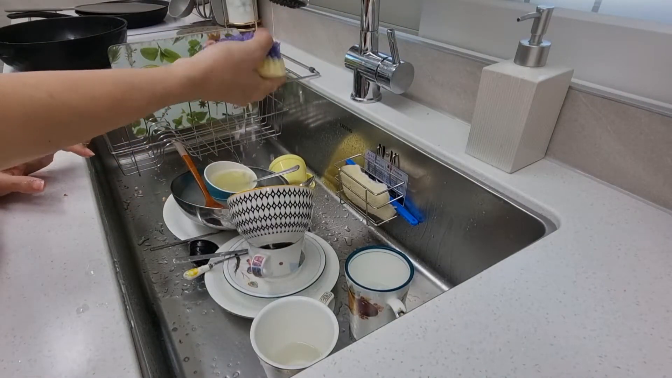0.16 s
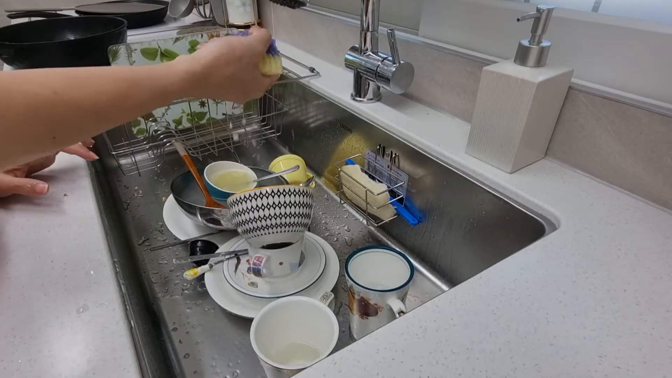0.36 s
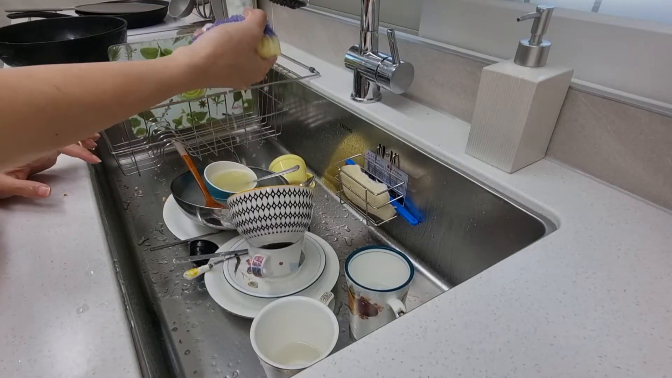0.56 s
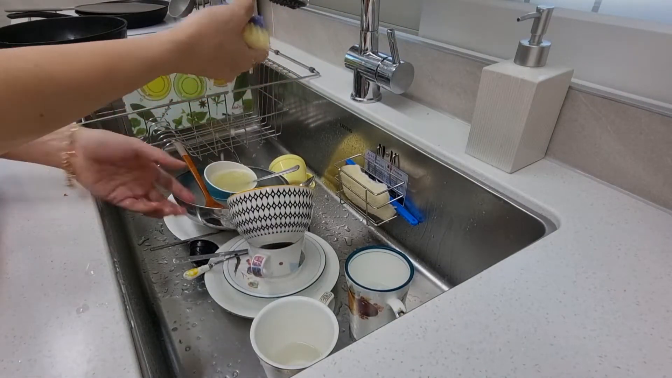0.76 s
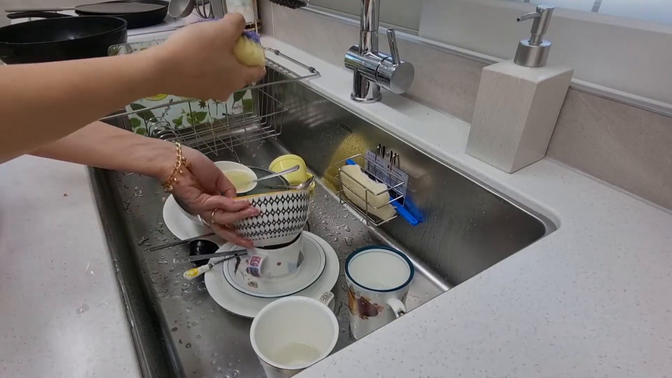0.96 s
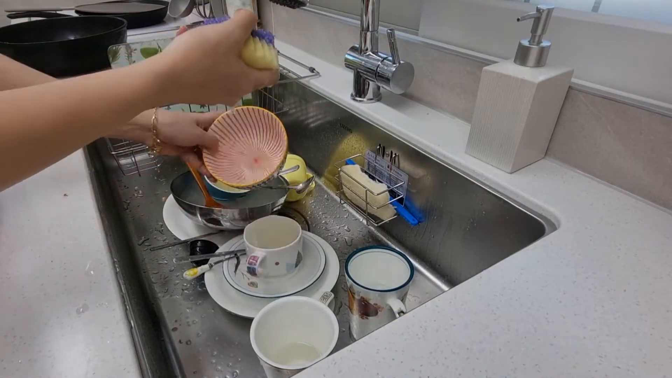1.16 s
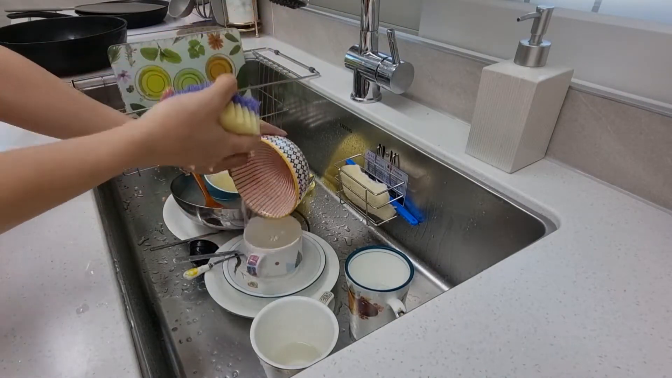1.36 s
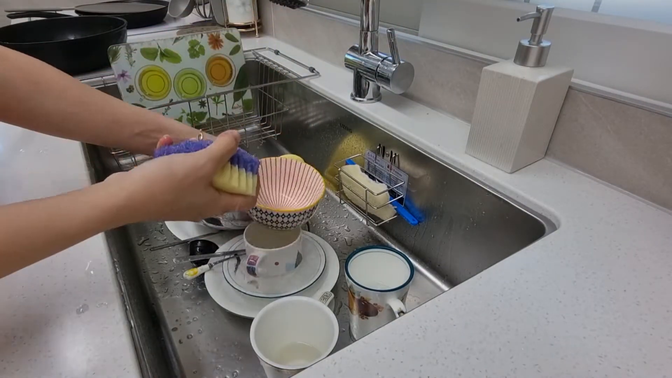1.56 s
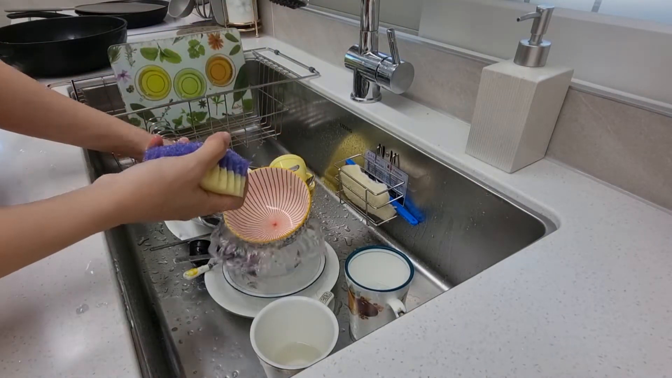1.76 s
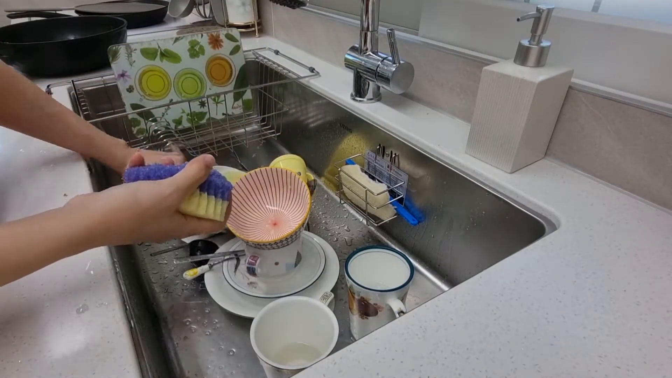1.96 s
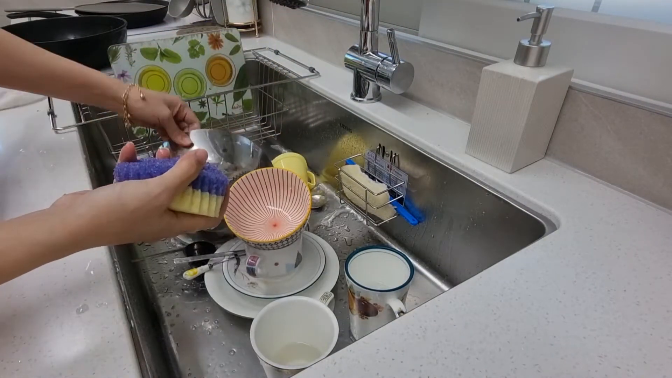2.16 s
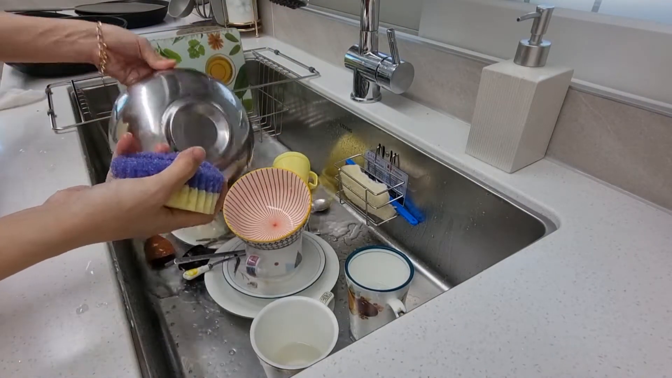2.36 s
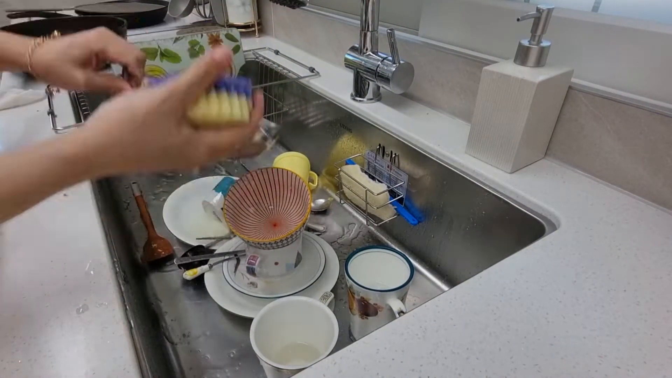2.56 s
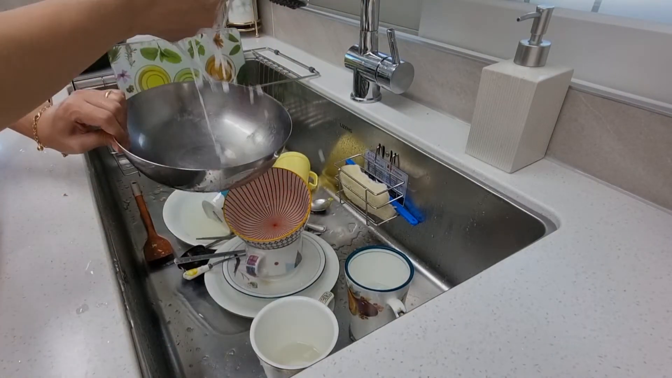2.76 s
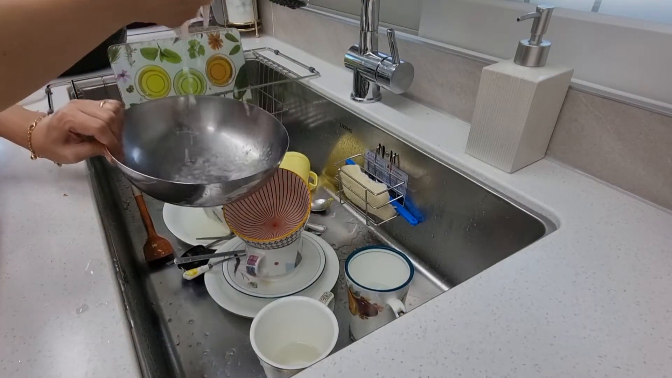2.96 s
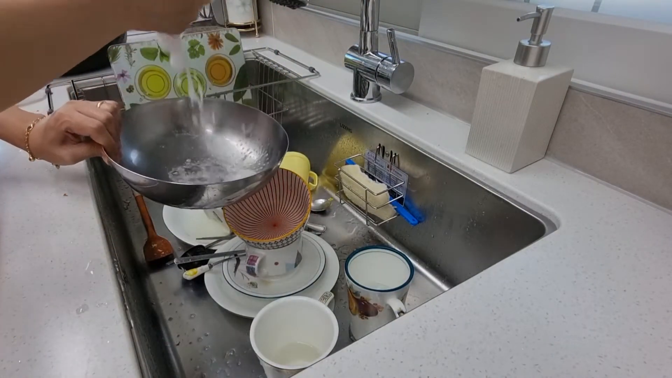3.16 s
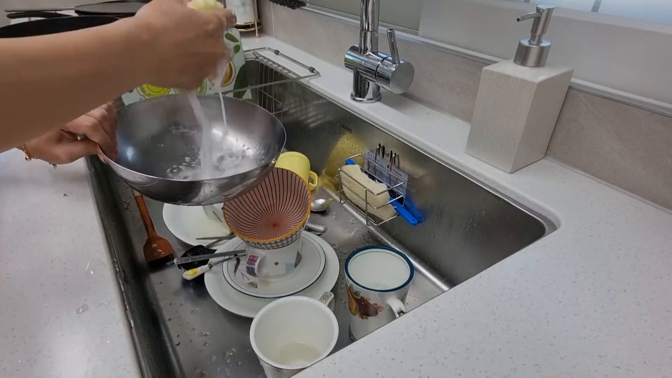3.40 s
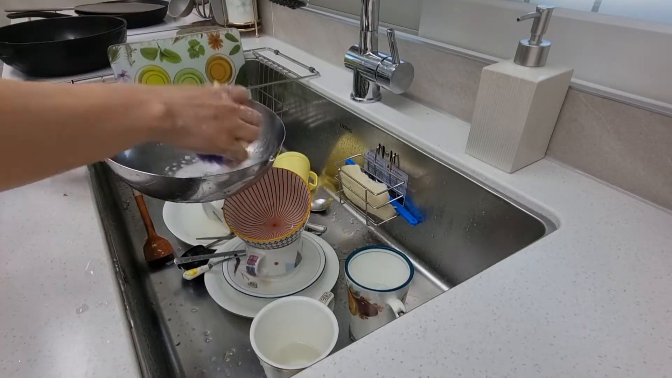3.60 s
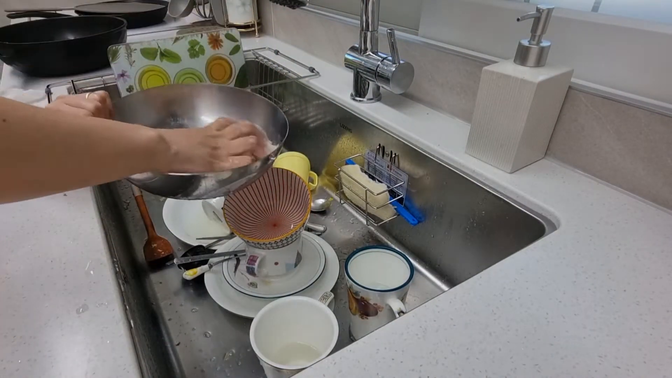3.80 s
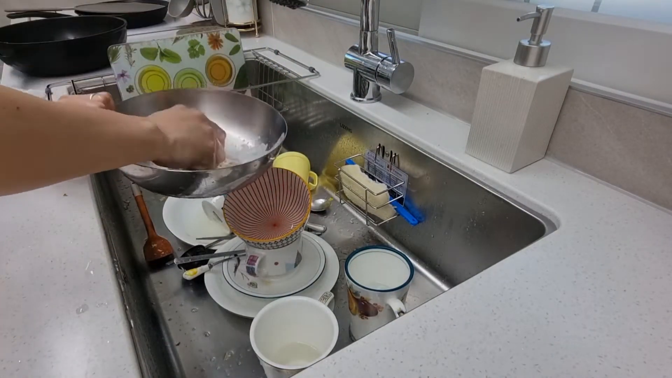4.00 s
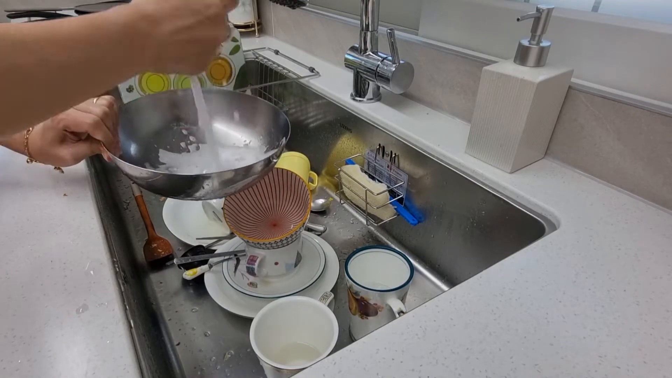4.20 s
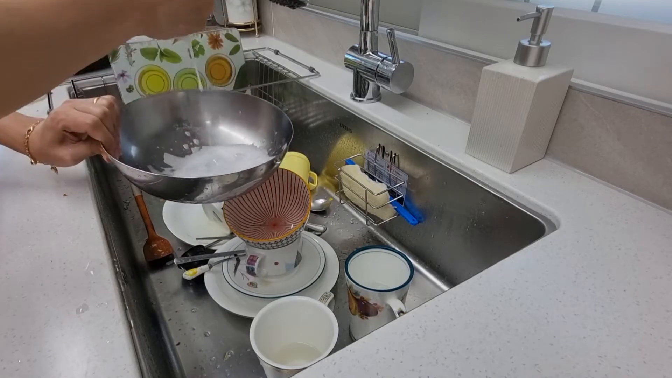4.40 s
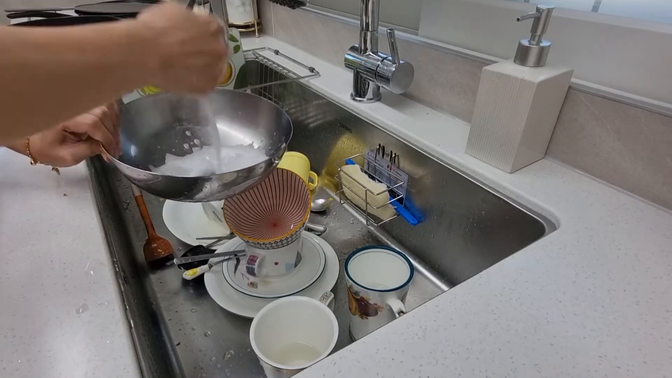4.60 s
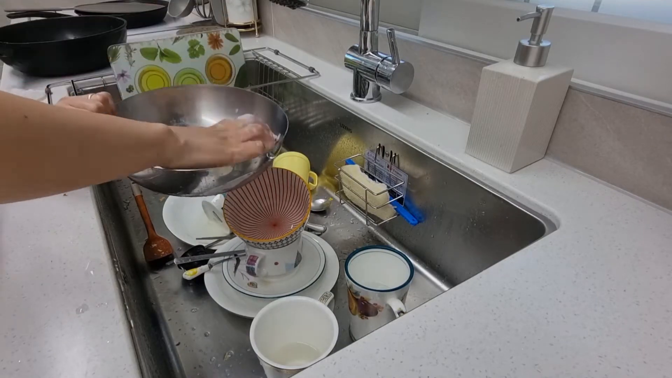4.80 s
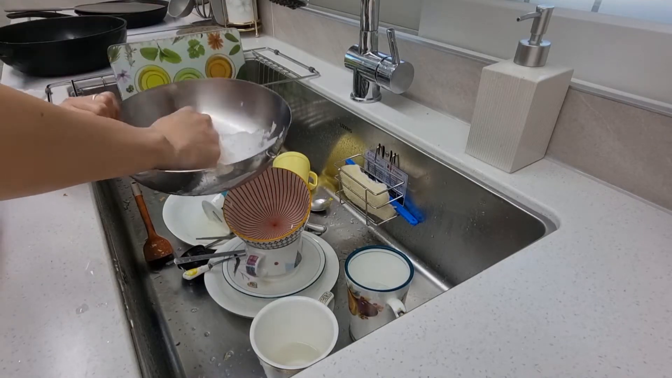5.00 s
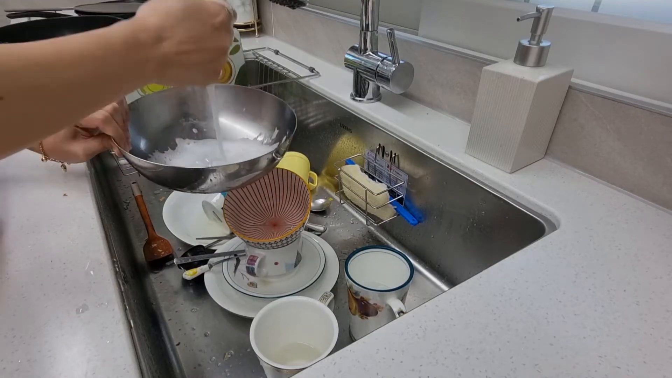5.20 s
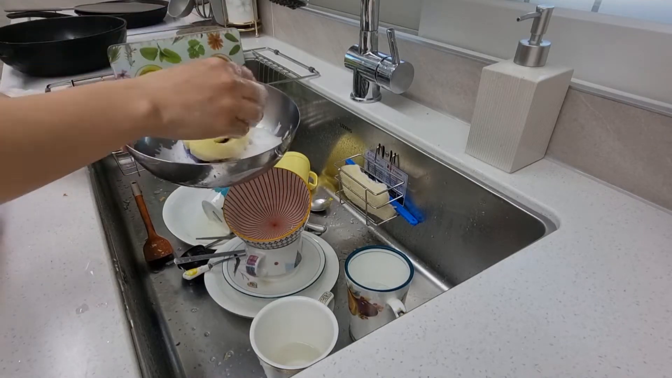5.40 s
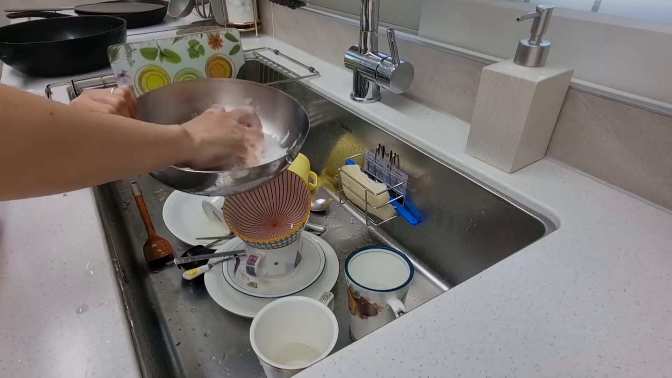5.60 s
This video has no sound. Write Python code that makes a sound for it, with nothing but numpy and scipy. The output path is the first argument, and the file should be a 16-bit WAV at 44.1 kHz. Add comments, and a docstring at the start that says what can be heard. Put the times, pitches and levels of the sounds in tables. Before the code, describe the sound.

Soft foamy squeezes and water taps, a burst of clinking china and rattling steel, then wet plops and slaps in a metal bowl.

```python
"""A wet sponge fizzes and swishes, and water squeezed from it patters and plops with dull, hollow taps.
Then crockery knocks and cutlery clatters in a steel sink, as a steel bowl is pulled from the pile.
Struck dishes are sums of decaying modes with filtered noise for the contact; foam and running water
are modulated noise with short bursts; bubbles and drips are gliding, decaying sines.
A small, quiet kitchen answers; two microphones about ten centimetres apart listen from close by."""
import sys
import numpy as np
from scipy import signal
from scipy.fft import rfft, irfft, next_fast_len
from scipy.io import wavfile
from scipy.ndimage import map_coordinates

SR = 44100
rng = np.random.default_rng(int(sys.argv[2]) if len(sys.argv) > 2 else 0)


def dump(signal):
    """Clip the signal to [-1, 1] and save it as 16-bit WAV at the path in sys.argv[1]."""
    limited = np.clip(np.atleast_2d(signal).T, -1, 1)
    pcm = np.round(limited * 32767).astype(np.int16)
    wavfile.write(sys.argv[1], SR, pcm)


N = 249165  # length (samples)
MIC_DELAY = 0.00028  # travel time between the microphones (s)
RIPPLE_DB = 5.5  # how far narrow resonances stand out of the treble of blows and ticks (dB)
PLINK_RISE_PER_S = 2.8  # a plink's pitch climbs as it dies (share per second)

# treble spectrum of hard contacts: f/Hz, density/dB per Hz
SPARKLE_SPECTRUM = [(1500, -41.5), (3500, -2.5), (5000, 3), (7000, 3.5), (10000, 0.5), (13000, 0.5),
                    (16000, -5.5)]


def amp(db):
    """Level to amplitude: 20 dB is a factor of ten."""
    return 10 ** (np.asarray(db) / 20)


def unit(x):
    """Normalisation by the mean square: x at rms 1."""
    return x / np.sqrt(np.mean(x ** 2) + 1e-20)


def along(points, hz):
    """Interpolation on a logarithmic frequency axis through (f/Hz, value) points."""
    f, v = np.transpose(points)
    return np.interp(np.log(hz + 1), np.log(f + 1), v)


def level(rows):
    """Envelope: gain for each sample, linear in decibels between (t/s, level/dB) rows."""
    s, db = np.transpose(rows)
    return amp(np.interp(np.arange(N) / SR, s, db))


def wobble(rate):
    """Band-limited random modulation: a smooth curve through `rate` random knots a second."""
    knots = rng.standard_normal(int(N * rate / SR) + 4)
    return map_coordinates(knots, [np.arange(N) * rate / SR])


def swell(s, half):
    """Hyperbolic-secant envelope of one stroke: it rises to 1 at time s and falls away again."""
    return 1 / np.cosh(np.clip((np.arange(N) / SR - s) / half, -20, 20))


def fade(t, t60, attack, hold=0):
    """Exponential decay after a quick rise; reflections between the sink walls hold it up at first."""
    decay = amp(-60 * (np.hypot(t, hold) - hold) / t60)
    return decay * (1 - np.exp(-t / attack))


def noise(spectrum, size=N, ripple_db=0):
    """Diffuse-field noise of rms 1: coherent between the microphones in the bass; ripple adds resonances."""
    m = next_fast_len(size)
    hz = np.fft.rfftfreq(m, 1 / SR)
    # a sinc coherence sets the balance of mid and side
    turn = np.arccos(np.sinc(2 * hz * MIC_DELAY)) / 2
    white = rfft(rng.standard_normal((2, m)))
    knots = np.arange(0, SR / 2, 55)
    peaks = np.array([np.interp(hz, knots, row) for row in rng.standard_normal((2, len(knots)))])
    colour = amp(along(spectrum, hz) + ripple_db * peaks * hz / (hz + 1200))
    mid, side = irfft(white * colour * [np.cos(turn), np.sin(turn)], m)[:, :size]
    return unit(np.array([mid + side, mid - side]))


def ring(modes, t, attack, detune, scatter_db, spread=1):
    """Modal superposition: decaying sines of scattered strength, each with its own lag between the ears."""
    hz, db, t60 = np.transpose(modes)[:, :, None]
    pitch, strength = rng.standard_normal((2, len(modes), 1))
    phase, direction = rng.uniform(-0.97, 1, (2, len(modes), 1))
    gain = amp(db + scatter_db * strength)
    swing = gain / np.linalg.norm(gain) * fade(t, t60, attack)
    lag = direction * spread * MIC_DELAY / 2
    turns = 2 * np.pi * hz * (1 + detune * pitch)
    ears = [swing * np.sin(turns * (t + ear * lag) + np.pi * phase) for ear in (-1, 1)]
    return np.sum(ears, axis=1)


def plink(hz, t60, rise):
    """Frequency glide of a decaying sine (rise: share of its pitch per second), from its own direction."""
    t = np.arange(int(SR * t60) + 2) / SR
    arrival = t + rng.uniform(-0.68, 0.39) * MIC_DELAY * np.array([[.5], [-.5]])
    return np.sin(2 * np.pi * hz * arrival * (1 + rise * t / 2)) * fade(t, t60, 0.0015)


def add(track, s, sound):
    """Linear superposition: mix a sound into the track at time s."""
    part = track[:, round(s * SR):][:, :sound.shape[-1]]
    part += sound[..., :part.shape[-1]]


def sponge(count=64):
    """Bursting foam as modulated noise: each squeeze crackles, single bubbles pop, wet ones swish fuller."""
    # squeezes and rubs: t/s at the height, level/dB before the foam gain, half length/s, swish re fizz/dB
    squeezes = [(.005, -60, 0.019, -3.5), (0.103, -48.5, 0.01, -4), (0.279, -52.5, 0.021, -10.5),
                (0.46, -59.5, 0.0091, 3.5), (0.621, -54.5, 0.01, -4), (0.8, -57.5, 0.012, -6),
                (1.944, -47, 0.018, -16.5), (2.771, -56, 0.012, -28), (2.969, -52.5, 0.014, -6.5),
                (3.165, -48, 0.011, -5), (3.361, -50.5, 0.015, -7), (3.592, -46.5, 0.011, -1.5),
                (3.706, -67, 0.02, 12), (4.464, -63, 0.033, -0.5), (4.727, -63, 0.047, -0.5),
                (5.027, -64, 0.056, -1), (5.098, -58.5, 0.018, 10.5), (5.317, -64.5, 0.02, -5.5)]
    # foam fizzing by itself between the squeezes: t/s, level/dB before the foam gain
    foam_rows = [(0, -61.5), (.85, -65.5), (1.2, -74), (2.75, -67.5), (3.4, -64.5), (3.95, -65),
                 (4.3, -65.5), (4.38, -74.5), (5.65, -79)]
    # spectrum of the fine fizz: f/Hz, density/dB per Hz
    fizz_spectrum = [(500, -78.5), (1200, -12.5), (2600, 6.5), (3800, -2.5), (5500, 3.5), (8000, 2),
                     (11000, 1.5), (15000, 0.5)]
    # spectrum of the fuller swish: f/Hz, density/dB per Hz
    swish_spectrum = [(300, -99), (900, 9.5), (1500, 12), (2600, 7.5), (4000, 1), (6000, 0.5), (10000, -9),
                      (15000, -16.5)]
    pops_per_s, pop_db = 7.3, 12.5  # inverse of the median gap, median level re the fizzing foam
    fizz = noise(fizz_spectrum, ripple_db=2)
    swish = noise(swish_spectrum, ripple_db=3)
    push = sum(amp(db) * swell(s, half) for s, db, half, _ in squeezes)
    wet = sum(amp(db + swish_db) * swell(s, half) for s, db, half, swish_db in squeezes)

    pops, t = np.zeros((1, N)), np.arange(SR // 20) / SR
    gap, size = rng.standard_normal((count, 2)).T
    times = np.cumsum(np.exp(.5 * gap)) / pops_per_s
    for s, db in zip(times, pop_db + 3 * size):
        add(pops, s, amp(db) * fade(t, 0.026, .0005))

    crackle = unit(amp(1.5 * wobble(490)))
    foam = np.hypot(level(foam_rows) * np.hypot(1, pops), push) * fizz * crackle
    splashes = unit(amp(3.5 * wobble(420) + 1.5 * wobble(60)))
    return amp(2.0) * foam + wet * swish * splashes


def flow():
    """Power sum of the running water: each runoff starts, thins out and stops over a faint trickle."""
    # water running off the sponge and the dishes: t/s at the start, length/s, level/dB at the start
    runoffs = [(0.125, 0.33, -57), (1.053, 0.057, -51), (1.521, 1, -52), (2.547, 0.41, -64),
               (3.084, 0.394, -59.5), (3.647, 0.72, -48.5), (4.466, 0.061, -52.5)]
    rise_s, sag_db_per_s, release_s = 0.015, 9.5, 0.027
    total = amp(-68)  # what keeps draining in between
    for s, length, db in runoffs:
        t = np.maximum(np.arange(N) / SR - s, 0)
        gate = np.minimum(t / rise_s, 1) * np.exp(-np.maximum(t - length, 0) / release_s)
        total = np.hypot(total, amp(db - sag_db_per_s * t) * gate)
    return total


def drops(running, count=220):
    """Random arrivals of small taps, their level following the flow; columns as the taps in water()."""
    per_s = 35  # inverse of the median gap
    gap, size, upper, middle, low_pitch, upper_pitch = rng.standard_normal((count, 6)).T
    s = np.cumsum(np.exp(0.59 * gap)) / per_s
    flow_db = 20 * np.log10(np.interp(s, np.arange(N) / SR, running))
    db = flow_db - 5 + 2 * size
    upper_db, middle_db = -1.5 + 3 * upper, 0.5 + 3 * middle
    low_hz = 467.4 * np.exp(.3 * low_pitch)
    upper_hz = 1561 * np.exp(.06 * upper_pitch)
    return np.transpose([s, db, upper_db, middle_db, low_hz, upper_hz])[s < N / SR]


def water():
    """Soft blows have long contacts and drive the low, damped modes of wet steel; a dribble runs between."""
    # dull taps of water and sponge on steel, levels before the gains of the parts:
    # t/s, level/dB, upper tone/dB re level, middle tone/dB re level, low tone f/Hz, upper tone f/Hz
    taps = [(0.126, -48, -8, -20, 354, 1570), (.148, -44, -11, -1.5, 377, 1540),
            (0.176, -52, 3.5, -4, 350, 1570), (.235, -42, -16, -3.5, 569, 1520),
            (.26, -43.5, -12, -5, 600, 1500), (.274, -43, -14, -12, 310, 1610),
            (.327, -44.5, -10, -10, 360, 1626), (.359, -45, -8, -11, 550, 1630),
            (.368, -40, -10.5, 1, 584, 1494), (.425, -42.5, -12, -3, 594, 1520),
            (0.8048, -40, 0, -10, 635, 1620), (.821, -39, -7.5, -7.5, 586, 1536),
            (.873, -42, -7, -3.5, 582, 1534), (1.243, -46, -40, -31, 656, 1550),
            (1.375, -46.5, 0.5, -8.5, 642, 1595), (1.458, -37, -20, -20, 583, 1560),
            (1.983, -38, -20, -13, 681, 1550), (3.075, -53.5, 2, -10, 304, 1500),
            (3.687, -36, -8.5, -24, 428, 1454), (3.703, -25, -14.5, -16, 585, 1584),
            (3.713, -30, -26, -29, 384, 1450), (3.761, -23.5, -35, -14.5, 609, 1540),
            (3.787, -32, -13.5, -17, 555, 1564), (3.827, -30, -9, -18, 617, 1520),
            (3.869, -31.5, -11.5, -10, 293, 1570), (3.885, -30, -19, -18, 284, 1583),
            (3.908, -30.5, -18.5, -26, 428, 1530), (3.937, -39.5, -8, -15, 340, 1635),
            (3.985, -36, -8.5, -6, 610, 1506), (4.046, -43.5, 2, -23, 576, 1520),
            (4.082, -41, -9, -20, 614, 1490), (4.102, -55.5, 14.5, -10, 470, 1523),
            (4.121, -30.5, -1.5, -16, 611, 1507), (4.179, -30.5, -15, -13, 595, 1530),
            (4.22, -34.5, -13.5, -7.5, 590, 1596), (4.264, -37, -5.5, -15, 526, 1510),
            (4.276, -32, -14, -24, 581, 1594), (4.315, -42, -4, -14, 507, 1560),
            (4.333, -40, -23, -19, 214, 1590), (4.468, -40.5, -5.5, 0, 617, 1533),
            (4.519, -36, -20.5, -21, 596.4, 1550), (4.573, -48, -2, -14, 678, 1653),
            (4.858, -40.5, 7, -5, 638, 1573), (4.875, -38, -13, -13, 610, 1620),
            (5.003, -52, -6, 4, 605, 1512), (5.626, -44.5, -10, -9.5, 532, 1535)]
    # low modes of the wet steel: f/Hz, level/dB, t60/s
    hollow_modes = [(199, -7, 0.12), (253, -5.5, .11), (333, -4, 0.11), (432.3, -6.5, 0.15),
                    (554.7, -3.5, 0.13), (630, 2, 0.082)]
    # higher modes that ring with the upper tone: f/Hz, level/dB, t60/s
    rim_modes = [(1491, 0.5, 0.13), (1606, -2, 0.099), (1820, -12.5, 0.046), (2850, -19.5, .04)]
    # spectrum of the dribble: f/Hz, density/dB per Hz
    patter_spectrum = [(50, -10), (130, 0), (260, 2.5), (430, -3.5), (500, -23), (605, 2), (770, -24),
                       (930, -5), (1250, -16.5), (1530, -4), (1900, -22.5), (2700, -15.5), (3600, -39.5),
                       (9000, -39.5)]
    middle_hz = 955  # centre of every tap's middle tone
    out, t, running = np.zeros((2, N)), np.arange(SR // 6) / SR, flow()
    lumps = unit(amp(3.5 * wobble(70) + 1.5 * wobble(10)))
    dribble = amp(-0.5) * running * noise(patter_spectrum) * lumps
    for s, db, upper_db, middle_db, low_hz, upper_hz in np.vstack([taps, drops(running)]):
        low = amp(-0.5) * ring(hollow_modes, t, attack=0.0077, detune=0.039, scatter_db=3.0)
        bloop = ring([(low_hz, 0, .055)], t, attack=0.007, detune=0.01, scatter_db=0, spread=0.6)
        middle = ring([(middle_hz, 0, .045)], t, attack=0.0013, detune=0.045, scatter_db=0)
        upper = amp(12) * ring([(upper_hz, 0, .04)], t, attack=0.003, detune=0.0066, scatter_db=0)
        rim = amp(-1.0) * ring(rim_modes, t, attack=0.0032, detune=0.013, scatter_db=-4.0)
        tap = low + amp(5.5) * bloop + amp(middle_db + 3.0) * middle + amp(upper_db) * (upper + rim)
        add(out, s, amp(db) * tap)
    return out + dribble


def bubbles(hz, spread, t60, per_s, count):
    """Bubble resonance: a random stream of brief rising tones scattered around one pitch."""
    out = np.zeros((2, N))
    gap, size, pitch = rng.standard_normal((count, 3)).T
    times = np.cumsum(np.exp(.5 * gap)) / per_s
    rows = np.transpose([times, 2 * size, hz * np.exp(spread * pitch)])
    for s, db, bubble_hz in rows[times < N / SR]:
        add(out, s, amp(db) * plink(bubble_hz, t60, PLINK_RISE_PER_S))
    return out


def gurgle():
    """Bubble size sets pitch: large ones gurgle low, tiny ones spray and spatter as the sponge slaps down."""
    # bursts of wet spatter: t/s at the height, level/dB, half length/s
    spatters = [(3.717, -47.5, 0.017), (3.85, -45.5, 0.022), (3.942, -48, 0.0091), (4.167, -47, 0.008),
                (4.295, -40.5, 0.01)]
    running = flow()
    spatter = sum(amp(db) * swell(s, half) for s, db, half in spatters)
    large = bubbles(hz=440, spread=.5, t60=.055, per_s=200, count=1300)
    fine = bubbles(hz=2500, spread=.12, t60=.012, per_s=700, count=3700)
    return amp(-1) * running * large + (amp(-12) * running + spatter) * fine


def clicks():
    """Brief excitation: light touches tick as short noise; plinks and drips sound around one pitch."""
    # light wet clicks: t/s, level/dB before trim, treble/dB re level before trim
    click_rows = [(0.1463, -47.5, 10), (1.437, -64, 4.5), (1.494, -46.5, 2), (2.6416, -53.5, 15),
                  (4.1245, -32.5, -29), (4.758, -38.5, -7), (4.8759, -45, -3), (4.9759, -56, 1.5),
                  (5.406, -33.5, -8.5), (5.626, -44, 2)]
    # spectrum of a tick: f/Hz, density/dB per Hz
    tick_spectrum = [(300, -39), (900, -11.5), (1400, 9), (2400, 4.5), (3500, -3.5), (4800, -14),
                     (7000, -26), (15000, -53)]
    # small high plinks of drops and touching china: t/s, level/dB, f/Hz
    plink_rows = [(.343, -41, 3400), (1.436, -35, 3980), (1.442, -39.5, 5760), (1.466, -43.5, 3420),
                  (1.477, -41, 3700), (1.497, -41.5, 4400), (1.537, -37.5, 4680), (1.55, -29, 1650),
                  (1.554, -38, 2640)]
    # spectrum of the noise around a plink: multiple of its pitch, density/dB per Hz
    plink_spectrum = [(.4, -16), (.85, -11), (1, 0.5), (1.25, -11), (5, -31)]
    # thin gliding drips as the bowl is brought under the water:
    # t/s, level/dB, f/Hz at the start, t60/s, rise/share per second
    drips = [(2.651, -48, 993, .09, 2), (2.693, -56.5, 1300, .16, 2.5), (2.725, -56.5, 930, 0.33, 0.5),
             (3.047, -46, 1614, 0.064, -2.5)]
    out, t = np.zeros((2, N)), np.arange(SR // 10) / SR
    for s, db, treble_db in click_rows:
        tick = noise(tick_spectrum, size=len(t), ripple_db=RIPPLE_DB)
        treble = noise(SPARKLE_SPECTRUM, size=len(t), ripple_db=RIPPLE_DB)
        touch = tick + amp(treble_db - 0.5) * treble
        add(out, s, amp(db - 5) * touch * fade(t, 0.07, 0.0015))
    for s, db, hz in plink_rows:
        halo = noise(np.multiply(plink_spectrum, [hz, 1]), size=len(t), ripple_db=11)
        halo = amp(-14) * halo * fade(t, 0.11, 0.0022, hold=0.0057)
        add(out, s, amp(db) * plink(hz, t60=0.037, rise=PLINK_RISE_PER_S))
        add(out, s, amp(db) * halo)
    for s, db, hz, t60, rise in drips:
        add(out, s, amp(db) * plink(hz, t60, rise))
    return out


def dishes():
    """Impact excitation: a blow clacks, rings the struck piece, which chatters, and thuds into the sink."""
    # dishes and cutlery striking, levels before the gains of the parts: t/s, level/dB, sink thud/dB re level,
    # treble/dB re level, clack centre f/Hz, t60/s of clack, treble and bump, piece, its ring/dB re level
    clatter = [(1.037, -37, -0.5, -22.5, 1520, 0.26, "cup", -25),
               (1.0581, -21, -5, -10, 2310, 0.1, "cup", -4.5),
               (1.549, -39, 0.5, -31, 1720, 0.11, "saucer", -4.5),
               (1.5967, -12.5, -9, -16.5, 1850, 0.11, "china bowl", -3.5),
               (1.7463, -15, -12, -18, 2085, 0.11, "china bowl", -6),
               (1.8316, -14.5, -11.5, -6, 1825, 0.12, "saucer", -5.5),
               (2.036, -31, -8, 5, 2595, 0.61, "knife", -3.5),
               (2.083, -21, 0, 5.5, 1484, 0.32, "knife", -3),
               (2.132, -21, -15, 7, 2507, 0.33, "ladle", -0.5),
               (2.184, -17, -12.5, 5, 2450, 0.21, "spoon", 0),
               (2.228, -15, -17.5, -1, 1585, 0.14, "teaspoon", -17),
               (2.25, -19, -5, 4.5, 1570, 0.19, "teaspoon", -3.5),
               (2.293, -16.5, -12, 2.5, 2397, 0.25, "fork", -2),
               (2.3413, -15.5, -6.5, -2.5, 2040, 0.19, "steel bowl", 4.5),
               (2.366, -26, -10, -3.5, 2300, 0.11, "steel bowl", -9.5),
               (2.412, -16, -30.5, -5.5, 1400, 0.2, "sink wall", -6),
               (2.433, -30.5, -4, -24, 925, 0.16, "sink wall", 5),
               (2.505, -31, -4, 6, 1940, 0.15, "knife", -11),
               (2.515, -32.5, -2, -8, 1980, 0.12, "sink wall", -20),
               (2.565, -36.5, -9, 3, 990, 0.19, "sink wall", -14.5),
               (2.604, -46, -4, -11.5, 1210, 0.15, "sink wall", -17)]
    # spectrum of the clack: multiple of its centre frequency, density/dB per Hz
    clack_spectrum = [(.2, -52), (.5, -10), (.72, -7), (1, -2), (1.6, -4.5), (2.3, -10), (3.4, -19),
                      (7, -44.5)]
    # spectrum of the bump in the sink: f/Hz, density/dB per Hz
    thud_spectrum = [(30, -56), (90, -5.5), (220, -4), (400, -3), (480, -18.5), (620, -4), (800, -9.5),
                     (1200, -10), (3000, -83)]
    # modes of the sink: f/Hz, level/dB, t60/s
    sink_modes = [(76.3, -19.5, 0.25), (111, -15, 0.44), (166.5, -11, 0.17), (214.8, 6, 0.081),
                  (229, 0, 0.26), (313, 6, 0.15), (345, 4, 0.12), (529, -5, 0.17), (602, 1, 0.099),
                  (653, 4.5, 0.17), (728, -19, 0.099)]
    # modes of each china piece: f/Hz, level/dB, t60/s
    china = { "cup": [(1030, -4, 0.14), (1476, -3.5, 0.13), (2407, 2, 0.11), (2520, 1.5, 0.085),
             (3250, 2, 0.09), (6090, -5, 0.09), (6400, -3.5, 0.084), (8440, -7.5, 0.1), (11700, -6, 0.1)],
             "china bowl": [(1276, -9, .15), (1384, -2, .1), (1500, -1, .07), (1696, -9, .2),
             (1770, 0, .07), (1950, 0, .08), (2374, 1, .08), (2500, -3, .11), (3085, -10, .22),
             (3321, 0, .1), (3451, -7, .11), (4210, -5, .095)], "saucer": [(1470, -0.5, 0.09),
             (2000, -0.5, 0.078), (2573, -14, 0.2), (3220, -27, .09), (6670, -3.5, 0.055), (8118, -11, 0.1),
             (11730, -13, 0.1)]}
    # modes of each steel piece: f/Hz, level/dB
    steel = { "knife": [(1380, 0), (2450, 0), (2850, -2), (3450, -2), (4250, -1), (5580, -1), (5700, -1),
             (8350, -2), (11000, -2)], "ladle": [(2234, 1), (2403, -1), (2491, 1), (2680, -4), (3660, -3),
             (4054, -6), (5300, -4), (5538, -3), (5765, -4), (8166, -5)], "spoon": [(2234, 0), (3580, -2),
             (3730, 1), (4054, -1), (5200, -3), (5373, -5), (5760, -3), (7456, -7), (9950, -8),
             (14650, -8)], "teaspoon": [(1490, -2), (2250, -1), (5760, -2), (5850, 0)], "fork": [(1303, -5),
             (2223, 0), (2396, -1), (2491, -3), (4650, -7), (5950, -5), (6035, -2)],
             "steel bowl": [(312, -6), (1995, -4), (2028, 0), (2065, -5), (2495, -9), (3085, -10),
             (3165, -9), (4380, -11), (4457, -8), (6665, -14)], "sink wall": [(235, -3), (431, -2),
             (532, -2), (580, -4), (668, 1), (920, -8), (1222, -9), (1400, -4), (1485, 0), (1690, -5),
             (2685, -6), (2900, -7)]}
    steel_t60 = .145  # hands and neighbouring dishes keep steel from ringing long (s)
    pieces = dict(china)
    for name, modes in steel.items():
        pieces[name] = [(hz, db, steel_t60) for hz, db in modes]

    out, t = np.zeros((2, N)), np.arange(SR // 4) / SR
    for s, db, thud_db, treble_db, hz, t60, piece, ring_db in clatter:
        contact = fade(t, t60, .001, hold=0.0025) + amp(-4) * fade(t, .012, .0002)
        clack = noise(np.multiply(clack_spectrum, [hz, 1]), size=len(t), ripple_db=-1.5)
        clack = amp(-9.5) * clack * contact
        chatter = 1 + .25 * wobble(220)[:len(t)]  # the piece against the pile
        body = ring(pieces[piece], t, attack=.0005, detune=.002, scatter_db=1.5, spread=.8)
        body = amp(ring_db) * chatter * body
        grit = amp(2.2 * wobble(450)[:len(t)])
        sparkle = noise(SPARKLE_SPECTRUM, size=len(t), ripple_db=RIPPLE_DB)
        sparkle = amp(treble_db - 10.0) * grit * sparkle * fade(t, t60, 0.00067, hold=0.0058)
        sink = amp(1) * ring(sink_modes, t, attack=0.0063, detune=0.0074, scatter_db=5.0, spread=1.4)
        bump = amp(-6.5) * noise(thud_spectrum, size=len(t)) * fade(t, t60, 0.0049, hold=0.002)
        add(out, s, amp(db) * (clack + sparkle + body + amp(thud_db) * (sink + bump)))
    return out


def cutlery():
    """Sliding friction as resonant noise: skids run in tiny jolts, each with its own set of resonances."""
    # dishes and cutlery skidding over one another: t/s at the height, level/dB, half length/s
    skids = [(1.05, -45.5, 0.0097), (1.524, -52.5, 0.057), (2.112, -26.5, 0.018), (2.153, -28, 0.0094),
             (2.215, -24, 0.015), (2.287, -30.5, 0.006), (2.313, -25.5, 0.015), (2.576, -52, 0.048)]
    # spectrum of a skid: f/Hz, density/dB per Hz
    scrape_spectrum = [(35, -48), (60, -13.5), (305, -8), (475, -40.5), (657, -4), (792, -25), (1520, -9.5),
                       (1830, -26), (2250, -7.5), (2910, -12), (5710, -23.5), (6410, -23), (15500, -33)]
    jolts = unit(amp(3.5 * wobble(260)))
    return jolts * sum(amp(db) * swell(s, half) * noise(scrape_spectrum, ripple_db=8.0)
                       for s, db, half in skids)


def plop(hz=372, length=0.022):
    """Trapped-air resonance: a large bubble sounds for a few cycles and bursts."""
    out, t = np.zeros((2, N)), np.arange(SR // 10) / SR
    burst = 1 / (1 + (t / length) ** 16)  # steep cut-off after `length` seconds
    add(out, 3.085, amp(-33.5) * np.sin(2 * np.pi * hz * t) * fade(t, 0.64, 0.0013) * burst)
    return out


def kitchen(x):
    """Reverberation by convolution: hard walls return a short tail whose decay depends on frequency."""
    # reverberation of the kitchen: f/Hz, t60/s
    reverberation = [(100, 0.38), (400, 0.74), (2000, 0.3), (8000, 0.21), (15000, 0.12)]
    hz, t, z = signal.stft(rng.standard_normal((2, SR // 2)), SR, nperseg=256)
    decay = fade(t, along(reverberation, hz)[:, None], 0.00097)
    tail = signal.istft(z * decay, SR, nperseg=256)[1]
    return signal.fftconvolve(x, tail / np.linalg.norm(tail[0]), axes=1)[:, :N]


def scene():
    """Superposition of everything in the sink, its echo and the quiet air of the room."""
    # spectrum of the room air: f/Hz, density/dB per Hz
    air_spectrum = [(25, -25), (45, 1.5), (115, 1.5), (260, -11.5), (450, -13), (620, -0.5), (800, -18.5),
                    (1150, -27.5), (1480, -5), (1850, -21.5), (2600, -7.5), (5000, -33.5), (15000, -38.5)]
    soft = water() + gurgle() + plop()
    hard = clicks() + dishes() + cutlery()
    echo = kitchen(amp(-33.5) * hard + amp(-19.0) * soft)
    return sponge() + soft + hard + echo + amp(-69.5) * noise(air_spectrum)


def record(dry):
    """Linear filtering: each microphone has a slight colour, less deep bass and an upper band limit."""
    # colour of the microphones: f/Hz, left minus right/dB
    ports = [(150, 0.5), (340, -1.5), (600, -2), (950, 4.5), (1500, -2), (2200, 1), (5000, .5), (12000, 0)]
    top_hz, bass_hz = 15900, 42.
    m = next_fast_len(N + SR // 4)
    hz = np.fft.rfftfreq(m, 1 / SR)
    colour = amp(along(ports, hz) * np.array([[.5], [-.5]]))
    low_cut = hz ** 3 / np.sqrt(hz ** 6 + bass_hz ** 6)
    return irfft(rfft(dry, m) * colour * low_cut * (hz < top_hz), m)[:, :N]


dry = scene()
out = record(dry)
dump(out)
```